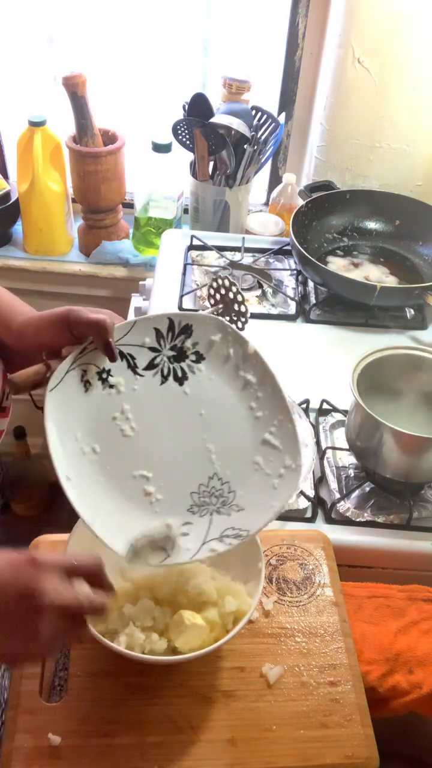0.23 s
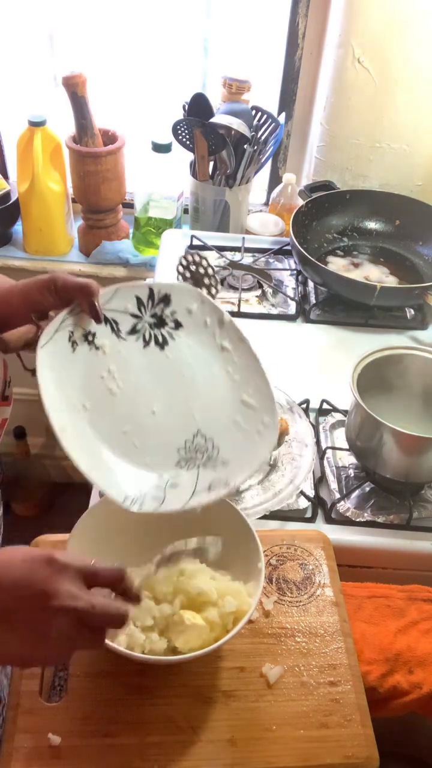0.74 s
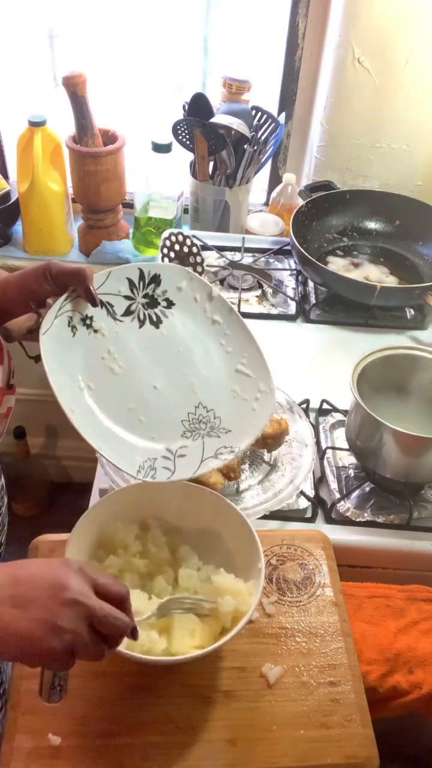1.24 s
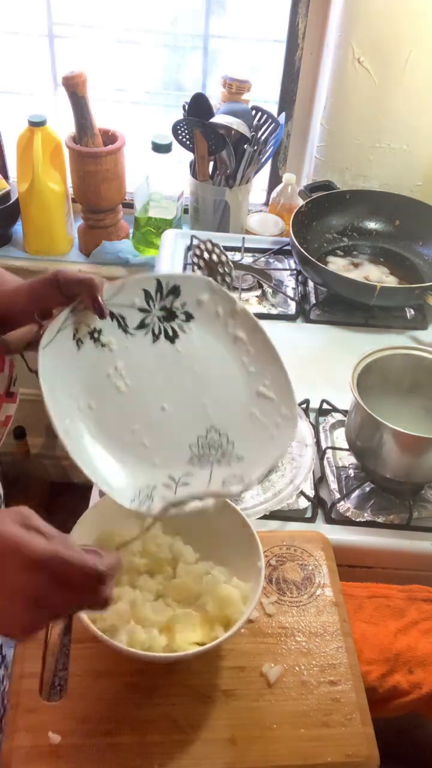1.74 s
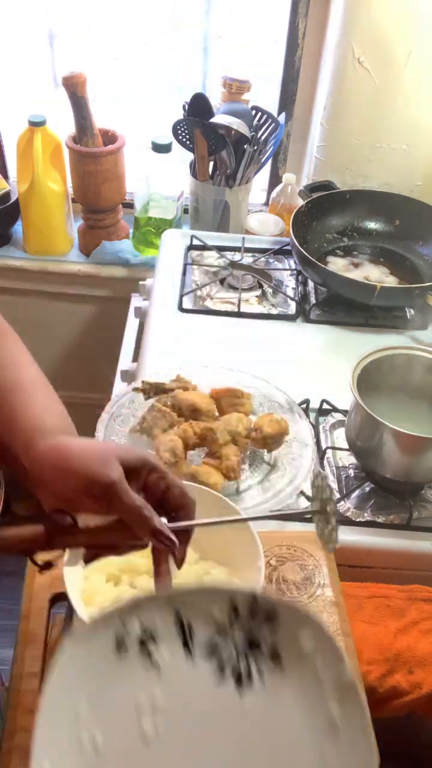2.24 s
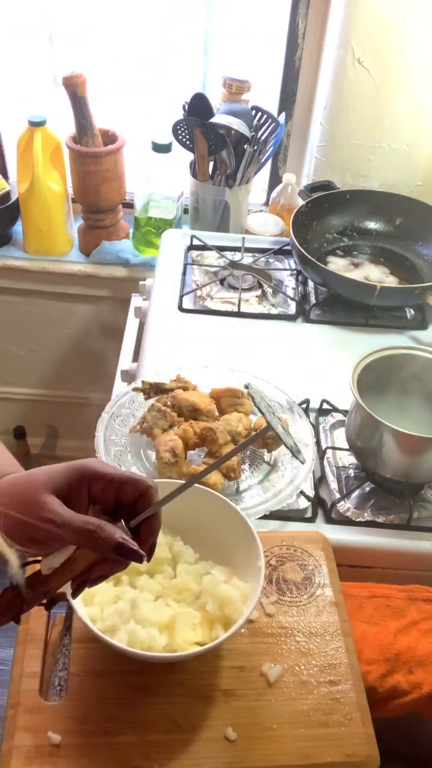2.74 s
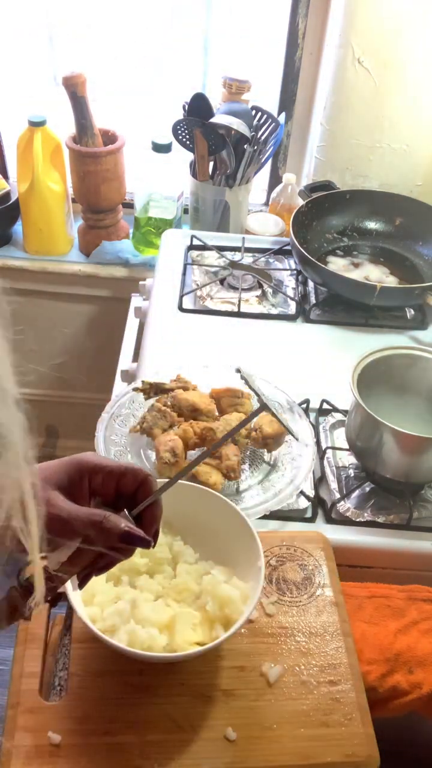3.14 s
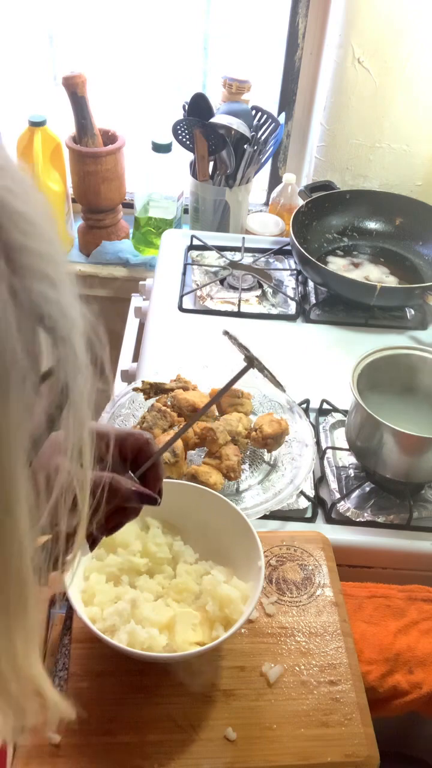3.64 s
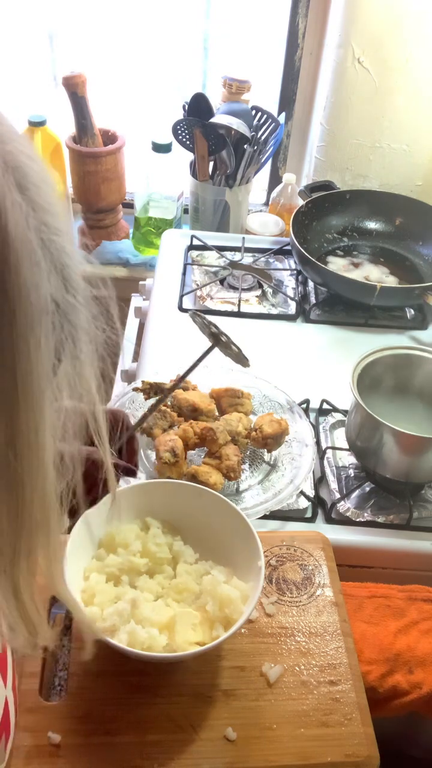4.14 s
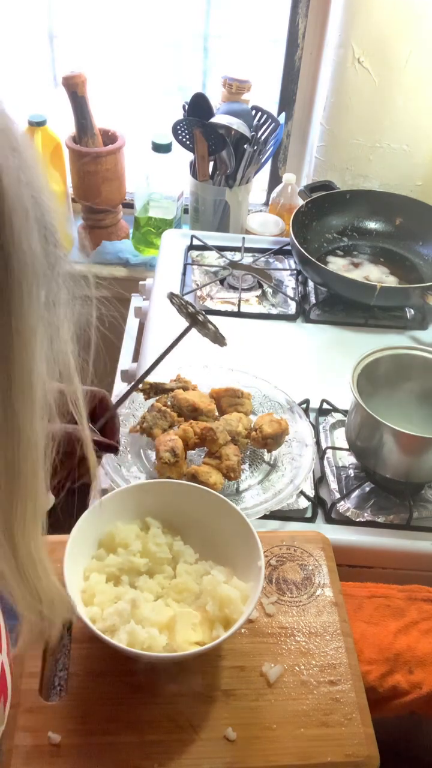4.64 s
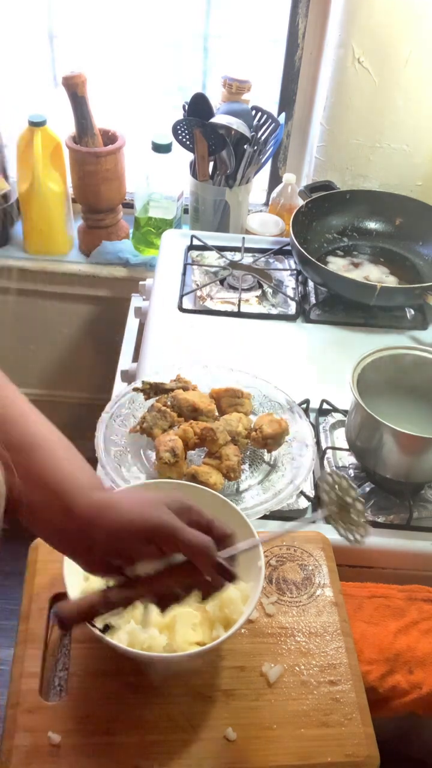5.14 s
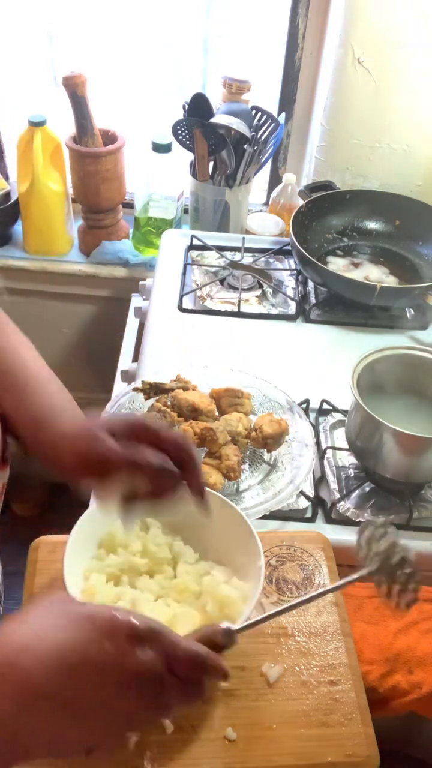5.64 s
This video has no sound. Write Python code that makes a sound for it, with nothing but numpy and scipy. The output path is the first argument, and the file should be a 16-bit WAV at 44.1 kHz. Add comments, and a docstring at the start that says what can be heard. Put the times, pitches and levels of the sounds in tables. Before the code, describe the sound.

Close in a small, quiet home kitchen, a fork faintly scrapes and taps a ceramic plate over a bowl, and the rim knocks the bowl once. After soft touches and a small clink, the plate bumps into a sink and dishes clatter in two loud bursts with bright cutlery rings. A tap then opens and hisses steadily to the end. Close stereo handheld pickup.

```python
"""Plate, sink and tap

Close in a small kitchen, a fork scrapes boiled potato off a ceramic plate into a bowl. The plate goes
into the sink, bumping against dishes and cutlery; then the tap is turned on and hisses steadily.
Contacts ring decaying modes under a noisy crack, friction is a stream of tiny slips through the same
modes, and water is shaped noise with narrow resonances. All lies over the quiet of the kitchen."""
import sys
import numpy as np
from scipy import signal
from scipy.fft import rfft, irfft, next_fast_len
from scipy.io import wavfile

SR = 44100
rng = np.random.default_rng(int(sys.argv[2]) if len(sys.argv) > 2 else 0)


def bounce(signal):
    """Save signal as a 16-bit WAV file at the path given by the first command-line argument."""
    frames = np.transpose(np.atleast_2d(signal))
    limited = np.clip(frames, -1, 1)
    pcm = np.round(limited * 32767).astype(np.int16)
    wavfile.write(sys.argv[1], SR, pcm)


N = 259743
HIT_LENGTH = int(.45 * SR)   # samples given to each contact
ATTACK = int(.02 * SR)   # samples over which the strength of a contact is taken

# Every table of hits has the columns [t/s, level/dB before gain_db, treble against mid-range/dB, chatter/s].
# Modes of the dishes [f/Hz, level/dB, t60/s]: struck, t60 is scaled by ring_scale;
# rubbed, the level is halved and t60 unused.
# The ceramic plate
PLATE_MODES = [(569, -3, 0.13), (709, -4, 0.21), (821, -1, .14), (1306, -5, 0.15), (1725, -1, 0.22),
               (1880, -11.5, .14), (2414, -7.5, 0.17), (2950, -9, 0.18), (2900, 4.5, 0.072),
               (3724, 2, 0.069), (4320, -2.5, 0.08), (5020, -7, 0.065), (5823, -1, 0.065),
               (5860, -3.5, .08), (7240, -16.5, 0.11), (8100, -18, .07), (9500, -10, 0.12)]
# A dish in the sink
DISH_MODES = [(553, -15.5, 0.16), (832.6, 2, 0.2), (1572, 4, 0.18), (1880, -5, 0.21), (2390, 0.5, 0.18),
              (2850, 0, 0.15), (3150, -4, 0.17), (3197, -2, 0.16), (3976, 6.5, 0.13), (4410, -9.5, 0.16),
              (4970, -1, 0.15), (6030, -6.5, 0.18), (7100, 1, 0.081), (8290, -1.5, 0.15), (9300, -4, 0.088),
              (10800, -24, .15)]
# Plate and bowl knocked together
BOWL_MODES = [(780, -17.5, 0.122), (1718, -11.5, 0.16), (2660, -6, .06), (2740, -4.5, 0.1),
              (2955, 5.5, 0.067), (2947, 1, 0.13), (3440, -6.5, .07), (4060, -7, 0.109), (4360, -12, .1),
              (5730, -10.5, .09), (6090, -19.5, .08), (7300, -30, .08), (9540, -16, 0.13)]
# Spectrum of the dense crack of a contact [f/Hz, level/dB per Hz]
CRACK_COLOUR = [(60, 5), (150, 0), (330, -6), (550, 6.5), (800, 4), (1100, 1.5), (1500, 0.5), (2100, 3),
                (3000, 4.5), (4300, 0.5), (5100, -10.5), (5900, 2.5), (6650, -14), (7400, -7), (9600, -11),
                (11300, -12), (12600, -29.5), (15500, -20)]


def plate_in_sink():
    """The plate bumps about in the sink, its modes ringing under a strong crack."""
    # Bumps of the plate
    plate_hits = [(2.8, -41, -20, 0.014), (2.826, -37, -20, 0.023), (2.961, -36.5, -21, 0.011),
                  (2.983, -43, -17, 0.0082), (3.286, -33.5, -25, 0.023), (3.327, -29.5, -38, 0.01),
                  (3.417, -17.5, -19.5, 0.01), (3.428, -17, -36, .015), (3.456, -22, -17, 0.031),
                  (3.486, -26, -22, .023), (3.559, -23.5, -21, 0.0099)]
    return contacts(plate_hits, PLATE_MODES, crack_db=4.5, crack_t60=0.049, ring_scale=0.76,
                    wet_db=-11.5, gain_db=-1, knock_db=-4.5)


def dish_in_sink():
    """A dish in the sink is knocked and rocks, ringing longer than the plate."""
    # Knocks on the dish
    dish_hits = [(3.121, -42, -10.5, 0.0041), (3.155, -50.5, -9, .013), (3.549, -31, -13, 0.015),
                 (3.591, -31, -9.5, 0.0037), (3.627, -35.5, 3, .004), (3.66, -34.5, 2, .0031),
                 (3.748, -37.5, -8, 0.012), (3.778, -37, 0.5, .02), (3.954, -17.5, -31, .0074),
                 (3.972, -17, -12.5, 0.013), (3.998, -25, -38, .03), (4.029, -14, -11, 0.0074),
                 (4.089, -25, -25, 0.018), (4.147, -34.5, -15, 0.019)]
    return contacts(dish_hits, DISH_MODES, crack_db=3.5, crack_t60=0.069, ring_scale=0.88,
                    wet_db=-9.0, gain_db=-1.0, knock_db=-4, lowest_hz=564)


def cutlery_in_sink():
    """Jolted cutlery rings in short bright modes."""
    # Jolts of the cutlery
    cutlery_hits = [(3.885, -27, -7, 0.064), (3.912, -25, 13, 0.0071), (3.927, -19, 0, 0.017)]
    # Modes of the cutlery [f/Hz, level/dB, t60/s before ring_scale]
    cutlery_modes = [(815, 13, 0.081), (1704, -31.5, 0.04), (3080, -1, 0.14), (4320, 3.5, 0.1),
                     (4860, -10, 0.21), (5700, -5, 0.12), (6230, 7.5, 0.065), (7430, 8.5, 0.043),
                     (7870, 4, 0.14), (8720, -6, .06), (9620, 5, 0.044)]
    return contacts(cutlery_hits, cutlery_modes, crack_db=0.5, crack_t60=0.037, ring_scale=0.42,
                    wet_db=-26.5, gain_db=-2.5, knock_db=-2.5, lowest_hz=450)


def crockery_shoved():
    """Crockery is shoved over the basin and grinds to rest: coarse slips excite ringing modes."""
    # Shoves [t/s, length/s, level/dB at the start]
    shove_rows = [(3.435, .38, -26.5), (3.945, 0.49, -20.5)]
    pressure = movements(shove_rows, attack_s=.09, release_s=.3, sag_db_per_s=90.5)
    return scrape(pressure, DISH_MODES[:10], slips_per_s=2000, width_hz=33, grit_db=-20, uneven_db=5.5)


def bowl_knocks():
    """The rim of the plate knocks against the bowl, with more ring than crack."""
    # Knocks of rim on bowl
    bowl_hits = [(.485, -35.5, -32, 0.022), (.493, -21.5, -17, .003), (.513, -35.5, -30.5, .008)]
    return contacts(bowl_hits, BOWL_MODES, crack_db=-19, crack_t60=0.028, ring_scale=0.53,
                    wet_db=-25.5, gain_db=0.9, knock_db=-15.5)


def rim_on_bowl():
    """The rim of the plate drags on the bowl: dense slips excite the modes of both."""
    # Drags [t/s, length/s, level/dB]
    drag_rows = [(.497, .033, -37)]
    pressure = movements(drag_rows, attack_s=0.022, release_s=0.033)
    return scrape(pressure, BOWL_MODES[:9], slips_per_s=4600, width_hz=63, grit_db=-25.5, uneven_db=4.5)


def fork_scrapes():
    """The fork slides over the glaze of plate and bowl: tiny slips excite the plate's upper modes."""
    # Strokes [t/s, length/s, level/dB]
    stroke_rows = [(0, .28, -54), (.56, 0.08, -48.5), (.87, .04, -70.5), (1.21, 0.051, -72),
                   (1.68, .06, -75), (1.92, 0.064, -69)]
    pressure = movements(stroke_rows, attack_s=.25, release_s=.25)
    return scrape(pressure, PLATE_MODES[5:], slips_per_s=4000, width_hz=140, grit_db=-16.0, uneven_db=2.0)


def fork_taps():
    """The fork taps the plate, which rings under a short crack."""
    # Taps of the fork
    tine_hits = [(.001, -46, -1.5, .003), (.26, -47, 2.5, 0.0097), (.272, -46.5, 4, 0.0063),
                 (.587, -59.5, 15.5, 0.01), (.622, -46, 6, 0.0081)]
    return contacts(tine_hits, PLATE_MODES, crack_db=4, crack_t60=0.041, ring_scale=0.76,
                    wet_db=-14.5, gain_db=-2.5, knock_db=-8.5)


def fork_laid_down():
    """The fork clinks as it is laid down, in its own bright modes."""
    # Clinks of the fork
    fork_hits = [(1.907, -72.5, 16, .0038), (1.976, -40.5, 11, 0.0069)]
    # Modes of the fork [f/Hz, level/dB, t60/s before ring_scale]
    fork_modes = [(562, -5, .08), (2380, -7, 0.066), (2880, 15, 0.066), (3070, 8, 0.062), (3140, 9, 0.1),
                  (3951, -2.5, 0.13), (4365, 4, 0.13), (4910, -6.5, 0.11), (5670, -2.5, 0.067),
                  (5820, -5, .07), (5910, -14, .12), (6050, -13.5, .07), (7240, -8, .08),
                  (8020, -5.5, 0.055), (9290, 0, 0.036), (9300, 4, 0.046), (9700, -14, 0.094),
                  (10700, -5, 0.066), (11300, -3.5, 0.065), (11450, -5, .055)]
    return contacts(fork_hits, fork_modes, crack_db=-7.5, crack_t60=0.063, ring_scale=0.94,
                    wet_db=-16.5, gain_db=0.0, knock_db=-14.5)


def soft_contacts():
    """Dull contacts are crack without ring."""
    # Fork in the potato, things shifted at the sink, first spurts of the tap
    soft_hits = [(1.357, -57, -30, 0.0075), (3.212, -52.5, -32, .02), (3.255, -42, -26, .003),
                 (3.856, -43.5, -6.5, 0.021), (4.232, -54, -23, 0.0096), (4.323, -39.5, -5.5, 0.022),
                 (4.435, -47, -4, 0.019)]
    return contacts(soft_hits, [], crack_db=0, crack_t60=0.067, ring_scale=1,
                    wet_db=-19, gain_db=3.5, knock_db=3)


def bumps():
    """Board and basin answer heavy contacts with low, damped notes."""
    # Deep bumps [t/s, level/dB, f/Hz, t60/s]
    bump_rows = [(0.001, -30.5, 119.6, 0.044), (0.522, -30.5, 235, .045), (0.544, -39, 70.6, 0.087),
                 (2.818, -22, 106, 0.11), (2.965, -37.5, 100, .4), (3.429, -26, 114.4, 0.43),
                 (3.963, -22.5, 65.5, 0.16), (4.351, -24, 181, 0.4), (4.354, -24.5, 113, 0.26)]
    rise_s = 0.00412
    out = np.zeros(N + HIT_LENGTH)
    t = np.arange(HIT_LENGTH) / SR
    for s, db, hz, t60 in bump_rows:
        start = int(s * SR)
        note = np.sin(2 * np.pi * hz * t) * dying(t, t60) * (1 - np.exp(-t / rise_s))
        out[start:start + HIT_LENGTH] += from_db(db) * note
    return out[:N]


TAP_OPEN_S = 4.33


def tap():
    """Water forced through the tap: smooth hiss with a row of narrow resonances."""
    # Whistling resonances [f/Hz, width/Hz before widening, level/dB]
    tap_peaks = [(5830, 510, -10), (6630, 130, -7.5), (7380, 140, -9), (8300, 180, -2), (9000, 250, -11),
                 (10060, 176, -3), (10960, 170, -5), (11600, 140, -13)]
    # Spectrum of the smooth hiss [f/Hz, level/dB per Hz]
    tap_colour = [(900, -20), (2500, -25), (4000, -4.5), (5000, -5), (6000, -0.5), (9000, -5.5), (11500, 2),
                  (12400, -18), (15500, -11)]
    level_db, attack_s = -41, 0.064
    start_db, settle_s = -5.5, 0.14   # weaker at first, until the flow settles
    jet = rng.standard_normal((2, N))
    whistle = np.zeros((2, N))
    for hz, width_hz, db in tap_peaks:
        # two resonances in series
        whistle += from_db(db) * resonate(resonate(jet, hz, 1.2 * width_hz), hz, 1.1 * width_hz)
    whistle = stereo(whistle)
    hiss = whistle / rms(whistle) + from_db(-3.5) * noise(tap_colour)
    open_for = np.maximum(np.arange(N) / SR - TAP_OPEN_S, 0)
    flow = from_db(start_db * np.exp(-open_for / settle_s))
    opening = movements([(TAP_OPEN_S, N / SR, level_db)], attack_s, release_s=1)
    return opening * flow * hiss / rms(hiss)


def rushes():
    """Dull, slightly lumpy rushes of noise swell and fade; the first water of the tap adds splashing."""
    # Dull rushes [t/s, length/s, level/dB]
    rush_rows = [(.495, 0.033, -39.5), (1.358, 0.028, -41.5), (1.83, 0.035, -54.5), (2.394, .59, -41),
                 (3.0, 1.3, -49), (3.228, 0.351, -36.5), (5.555, .195, -38.5), (5.76, 0.12, -55.5)]
    # Spectrum of the dull rush [f/Hz, level/dB per Hz]
    rush_colour = [(21, -52), (35, -9), (64, 1), (97, -2), (185, -4), (281, -2.5), (500, -9), (598, -10),
                   (833, -13), (973, -12), (1480, -16.5), (2880, -22), (4110, -27.5), (7000, -60.5),
                   (9100, -95), (15400, -120)]
    # Spectrum of the mid-range splashing [f/Hz, level/dB per Hz]
    splash_colour = [(300, -19), (1000, 2), (2000, -6), (3500, 3), (4500, -1), (6500, -30)]
    rumble_s, rumble_db, splash_db = 0.98, -40.5, -6.5   # splash relative to the rumble
    swelling = movements(rush_rows, attack_s=0.043, release_s=0.075)
    # the rumble under the hiss dies away
    water = movements([(TAP_OPEN_S, rumble_s, rumble_db)], attack_s=0.28, release_s=0.46, sag_db_per_s=11.5)
    splash = water * from_db(splash_db) * noise(splash_colour)
    lumps = from_db(1.7 * wander(count=300))
    return lumps * (np.hypot(swelling, water) * noise(rush_colour) + splash)


def quiet_kitchen():
    """The quiet of the kitchen: steady noise, mostly low."""
    # Spectrum of the quiet [f/Hz, level/dB per Hz]
    floor_colour = [(15, -37.5), (25, -5), (59, -4), (121, -13), (262, -9.5), (358, -14), (555, -7),
                    (600, -6.5), (700, -2.5), (756, -13.5), (1010, -13), (1270, -23), (3950, -40),
                    (5970, -34.5), (12000, -46.5), (15600, -94.5), (22000, -120)]
    return from_db(-57.5) * noise(floor_colour)


def contacts(hits, modes, crack_db, crack_t60, ring_scale, wet_db, gain_db, knock_db, lowest_hz=100):
    """Every contact sounds in the room; thud and knock follow its level, its brightness sets the treble."""
    # Edges of thud, knock, mid-range and treble [f/Hz]
    band_edges = [40, 250, 1200, 4700, 15500]
    thud_db = knock_db - 15.5
    t = np.arange(HIT_LENGTH) / SR
    out = np.zeros((2, N + HIT_LENGTH))
    registers = [signal.butter(8, edges, "band", fs=SR, output="sos")
                 for edges in zip(band_edges, band_edges[1:])]
    # smaller things knock higher
    knock_floor = signal.butter(4, lowest_hz, "high", fs=SR, output="sos")
    registers[1] = np.vstack([registers[1], knock_floor])
    for s, level_db, bright_db, chatter_s in hits:
        blow = strike(t, modes, max(chatter_s, 1e-3), crack_db, crack_t60, ring_scale)
        blow = stereo(signal.fftconvolve(blow, kitchen(t, wet_db), axes=1)[:, :HIT_LENGTH])
        start = max(int(s * SR), 0)
        for sos, db in zip(registers, (thud_db, knock_db, 0, bright_db)):
            part = signal.sosfilt(sos, blow)
            # the stronger of two overlapping windows
            strength = max(rms(part[:, :ATTACK]), rms(part[:, ATTACK // 2:ATTACK + ATTACK // 2]))
            out[:, start:start + HIT_LENGTH] += from_db(level_db + db + gain_db) * part / strength
    return out[:, :N]


def strike(t, modes, chatter_s, crack_db, crack_t60, ring_scale):
    """A click and fading chatter drive a short dense crack, over which the modes ring."""
    spread_db, detune = 2, 0.00098   # random spread of mode levels and of relative pitch
    crack = colour(rng.standard_normal((2, len(t))), CRACK_COLOUR) * dying(t, crack_t60)
    chatter = rng.random(len(t)) < 1500 / SR   # 1500 impulses a second on average
    force = rng.standard_normal(len(t)) * chatter * np.exp(-t / chatter_s)
    force[0] = 2   # the click
    crack = signal.fftconvolve(crack, force[None], axes=1)[:, :len(t)]
    ring = np.zeros((2, len(t)))
    for hz, db, t60 in modes:
        phase = rng.uniform(0, 2 * np.pi, (2, 1))
        pitch = hz * (1 + detune * rng.standard_normal())   # each mode is a little off pitch, at random
        gain = from_db(db + spread_db * rng.standard_normal())
        ring += gain * np.sin(2 * np.pi * pitch * t + phase) * dying(t, t60 * ring_scale)
    blow = ring / rms(ring[:, :ATTACK]) + from_db(crack_db) * crack / rms(crack[:, :ATTACK])
    return blow * (1 - np.exp(-t / (0.17 * chatter_s)))   # a long contact builds up slowly


def scrape(pressure, modes, slips_per_s, width_hz, grit_db, uneven_db):
    """Tiny slips, in uneven bunches, excite the modes of the dish that is rubbed."""
    rim_s, travel, rim_gain = 0.000902, 0.14, 0.5
    slips = rng.standard_normal((2, N)) * (rng.random(N) < slips_per_s / SR)
    slips = slips * from_db(uneven_db * wander(count=400))
    # the wave thrown back by the rim colours the sound differently as the contact travels
    earlier = np.arange(N) - rim_s * SR * np.exp(travel * wander(count=40))
    thrown_back = np.array([np.interp(earlier, np.arange(N), row) for row in slips])
    slips = slips + rim_gain * thrown_back
    body = sum(from_db(db / 2) * resonate(slips, hz, width_hz) for hz, db, _ in modes)
    rubbed = stereo(body + from_db(grit_db) * colour(slips, CRACK_COLOUR))
    return pressure * rubbed / rms(rubbed)


def movements(rows, attack_s, release_s, sag_db_per_s=0):
    """Gain that rises by 60 dB in the attack before t, holds or sags, and falls by 60 dB per release."""
    t = np.arange(N) / SR
    power = 0
    for s, length_s, db in rows:
        outside = np.maximum(s - t, 0) / attack_s + np.maximum(t - s - length_s, 0) / release_s
        held = from_db(db - sag_db_per_s * np.maximum(t - s, 0))
        power = power + (held * dying(np.minimum(outside, 2), 1)) ** 2
    return np.sqrt(power)


def kitchen(t, wet_db):
    """Room response: direct sound and a diffuse tail that builds up and dies."""
    t60, build_s = 0.37, 0.057
    tail = rng.standard_normal((2, len(t))) * dying(t, t60) * (1 - dying(t, build_s))
    response = from_db(wet_db) * tail / np.linalg.norm(tail[0])
    response[:, 0] += 1
    return response


def stereo(pair):
    """Direct sound reaches the two microphone ports out of step; an unrelated part widens the treble."""
    # Diffuse sound between the ports [f/Hz, level/dB of side against mid]
    width_curve = [(100, -62), (600, -50), (900, -20), (1300, -4.5), (3000, -2), (5000, -3.5),
                   (6200, -10.5), (7200, -19), (8200, -21), (9000, -19), (11000, -15.5), (14000, -15)]
    # Phase by which the left port lags the right [f/Hz, phase/rad]
    port_phase = [(0, 0), (950, 0), (1500, 2.04), (3500, 1.5), (4400, 1.58), (5200, 4), (6200, 4.5),
                  (8300, 6), (10000, 7.5), (11200, 8.5), (12800, 9), (16000, 10)]
    count = pair.shape[-1]
    size = next_fast_len(count + 2048)
    ports = pair[0] + colour(pair[1], width_curve) * np.array([[1], [-1]])
    phase = np.interp(np.fft.rfftfreq(size, 1 / SR), *np.transpose(port_phase))
    lag = np.exp(-.5j * phase)   # half to each port, in opposite directions
    return irfft(rfft(ports, size) * np.array([lag, lag.conj()]), size)[:, :count]


def noise(points):
    """Coloured stereo noise of rms 1."""
    x = stereo(colour(rng.standard_normal((2, N)), points))
    return x / rms(x)


def colour(x, points):
    """Filter by a spectrum of (f/Hz, level/dB) points, interpolated over log frequency."""
    size = next_fast_len(x.shape[-1] + 2048)
    hz, db = np.transpose(points)
    bins = np.maximum(np.fft.rfftfreq(size, 1 / SR), 1)
    gain = from_db(np.interp(np.log(bins), np.log(hz), db))
    return irfft(rfft(x, size) * gain, size)[..., :x.shape[-1]]


def resonate(x, hz, width_hz):
    """A two-pole resonance of about gain 1 at its top."""
    r = np.exp(-np.pi * width_hz / SR)
    poles = [1, -2 * r * np.cos(2 * np.pi * hz / SR), r * r]
    return (1 - r * r) / 2 * signal.lfilter([1, 0, -1], poles, x)


def wander(count):
    """A random course through count points spread over the whole scene."""
    return np.interp(np.arange(N), np.linspace(0, N, count), rng.standard_normal(count))


def dying(t, t60):
    """A decay of 60 dB in t60 seconds."""
    return np.exp(-np.log(1000) * t / t60)


def from_db(db):
    """Decibels to gain."""
    return 10 ** (np.asarray(db) / 20)


def rms(x):
    """Root mean square."""
    return np.sqrt(np.mean(x ** 2) + 1e-24)


def scene():
    """Crockery, friction and water over the quiet of the kitchen."""
    sink = plate_in_sink() + dish_in_sink() + cutlery_in_sink() + crockery_shoved()
    bowl = bowl_knocks() + rim_on_bowl()
    fork = fork_scrapes() + fork_taps() + fork_laid_down()
    dull = soft_contacts() + bumps()
    return sink + bowl + fork + dull + tap() + rushes() + quiet_kitchen()


def record(dry):
    """Full scale bounds the peaks, then a steep low-pass takes 70 dB off everything above 16.5 kHz."""
    steep = signal.cheby2(14, 70, 16500, fs=SR, output="sos")
    return signal.sosfilt(steep, np.clip(dry, -1, 1))


dry = scene()
out = record(dry)
bounce(out)
```